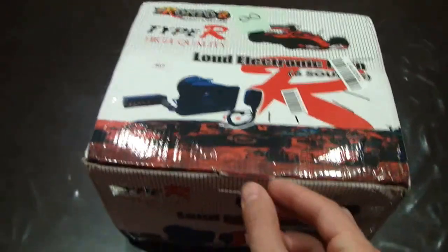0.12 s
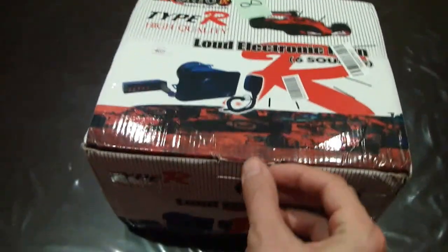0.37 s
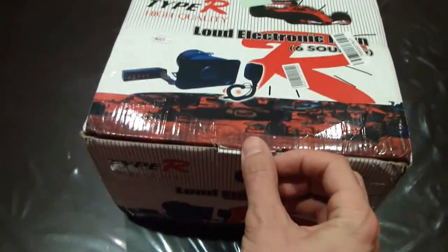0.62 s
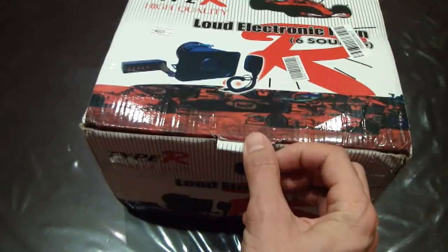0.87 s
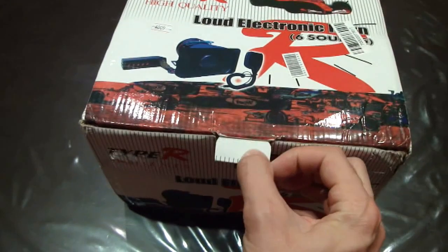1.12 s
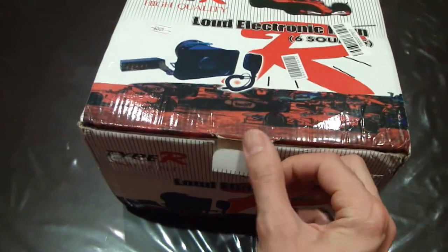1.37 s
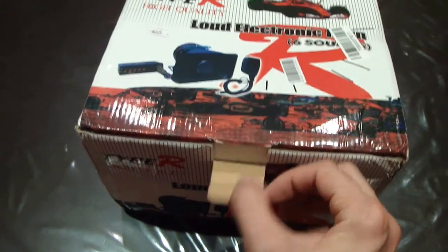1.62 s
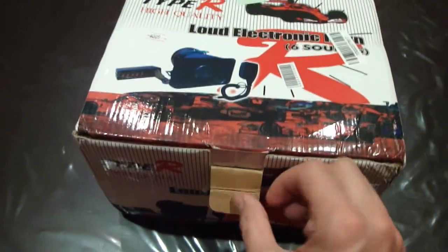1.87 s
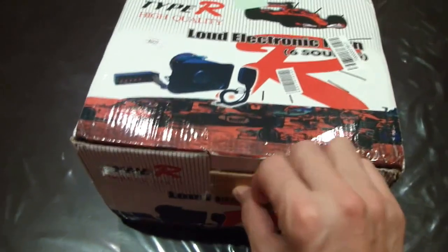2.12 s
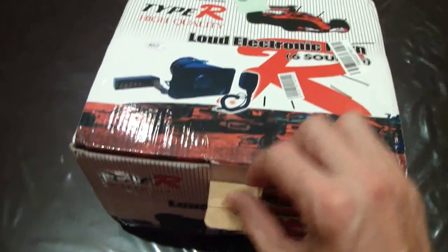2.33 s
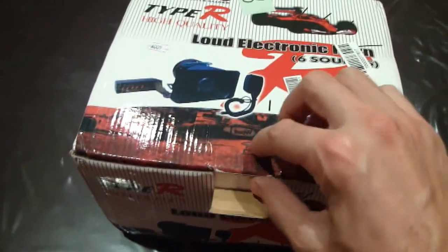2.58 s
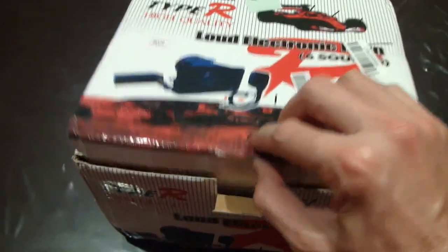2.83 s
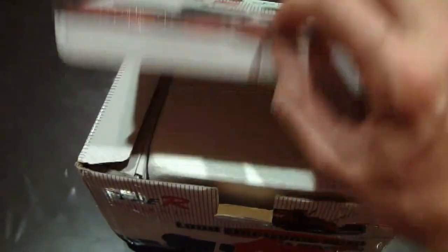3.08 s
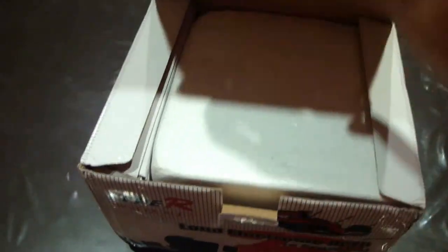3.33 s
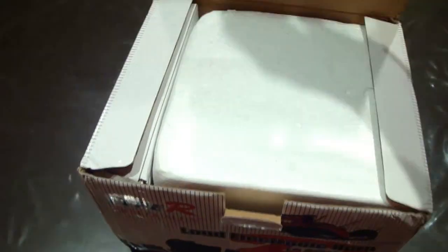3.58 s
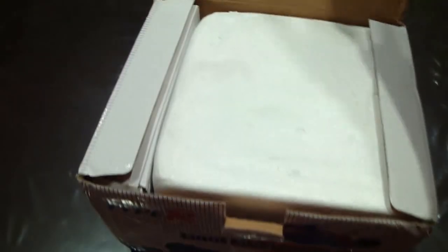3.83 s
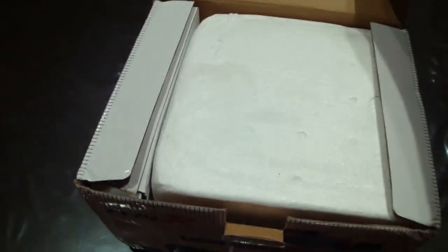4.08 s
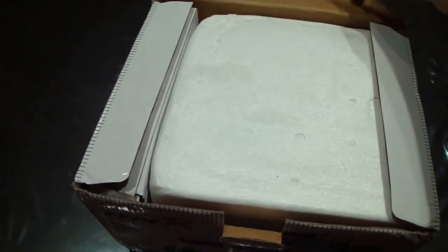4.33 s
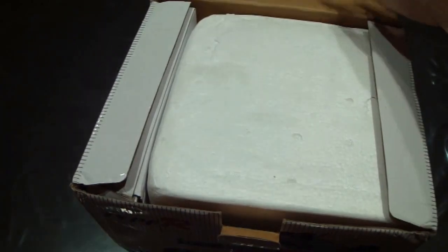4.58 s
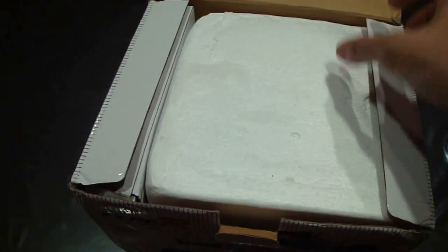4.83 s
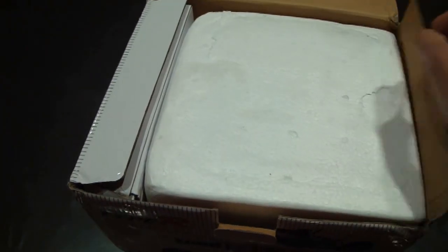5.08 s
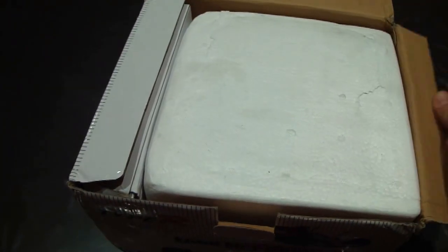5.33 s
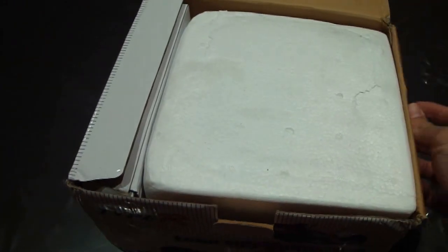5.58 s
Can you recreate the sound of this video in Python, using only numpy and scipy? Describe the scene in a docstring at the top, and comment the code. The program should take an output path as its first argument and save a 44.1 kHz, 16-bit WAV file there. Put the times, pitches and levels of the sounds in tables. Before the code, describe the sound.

Close, dry recording of cardboard handling, with a short, faint room tail. Fingers scratch at a tab, a sharp loud knock jumps out at about a second and a half, then quieter rubbing leads to a quick rattling burst of knocks and hollow drag. Papery scrapes swell in the middle, and sparse clicks and creases finish it. Low hiss and a thin, high, unsteady buzz continue underneath.

```python
"""A hand opens a foam-packed cardboard box in a quiet room, close to the microphone: it works the tab loose,
pulls the lid out and folds back a flap. Rubbing fingers are random slips driving rasps and box panels; knocks
are ragged blows that ring the panels; creases snap as filtered bursts; low jolts come through the table.
The room answers with a brief tail of sparse taps. Behind lie hiss, made of random spectra, and a faint
electrical buzz of about sixty ringing ticks a second."""
import sys
import numpy as np
from scipy import signal
from scipy.fft import rfft, irfft
from scipy.io import wavfile
from scipy.ndimage import uniform_filter1d

SR = 44100
rng = np.random.default_rng(int(sys.argv[2]) if len(sys.argv) > 2 else 0)


def master(y):
    """Save y as 16-bit WAV."""
    cut = np.clip(np.atleast_2d(y).T, -1, 1)
    pcm = np.round(cut * 32767)  # scale
    wavfile.write(sys.argv[1], SR, pcm.astype(np.int16))


def volts_from_decibels(level):
    """Turn decibel levels (scalar or array-like) into linear amplitude factors."""
    exponent = np.asarray(level, float) / 20
    return 10 ** exponent


N = 250488  # length in samples

# Room murmur and microphone hiss. Each row: frequency in Hz, relative density in dB per Hz.
HUSH_SPECTRUM = [(15, -57), (25, -31), (113, -13.5), (219, -5.5), (347, -1.5), (375, 1), (405, -2.5),
                 (940, -2.5), (1280, -7), (2750, -11.5), (2970, -11), (5480, -14.5), (6070, -17),
                 (7440, -17.5), (11200, -18.5), (14600, -55), (22000, -120)]
HUSH_DB = -52  # rms level
# The electrical buzz swelling and dropping out. Each row: time in seconds, tick level in dB.
BUZZ_LEVEL = [(0, -51.5), (.85, -52.5), (1.3, -47.5), (2.45, -46.5), (2.55, -50.5), (3.7, -52), (3.9, -48),
              (4.15, -45.5), (4.3, -54), (4.49, -42.5), (4.505, -60), (5.42, -58), (5.44, -46.5),
              (5.57, -53), (5.6, -66), (5.68, -70)]
# Resonances of one tick. Each row: frequency in Hz, width in Hz, relative level in dB.
TICK_MODES = [(4740, 640, 2.5), (5940, 320, -4), (6640, 99, -4), (7620, 100, 1.5), (9240, 580, 5),
              (10360, 600, 3)]
TICKS_PER_S, FIRST_TICK_S, TICK_ECHO_S = 59.94, 0.0066, 0.0011
# How long the room rings. Each row: frequency in Hz, time to fall 60 dB in seconds.
ROOM_T60 = [(150, 0.56), (400, 0.35), (1040, 0.4), (2760, 0.43), (7280, 0.37)]
# The table and the camera jolted. Each row: start in seconds, level in dB, frequency in Hz.
JOLTS = [(1.408, -47, 262), (1.404, -59, 140), (1.402, -68, 40), (2.83, -72, 180), (3.914, -70, 66),
         (4.163, -69, 92), (4.565, -53.5, 200), (4.57, -63, 126)]
JOLT_WIDTH_HZ = 34
# A small box sends out little bass. Each row: frequency in Hz, gain in dB.
RADIATION = [(20, -54), (60, -60), (120, -12), (200, -7), (300, 0), (20000, -0.5)]
# Panels of the box. Each row: frequency in Hz, width in Hz, relative level in dB.
BOX_PANELS = [(181, 44.5, -8), (292, 44, -6.5), (370, 47, -19.5), (468, 126, 0.5), (527, 137, 4.5),
              (639, 110, -0.5), (833, 153, 9), (1104, 74, 10), (1345, 139, 14), (1560, 190, 7),
              (2070, 170, 13.5), (2506, 160, 13.5), (3180, 99, 12), (3400, 92, 13), (3800, 50, -9),
              (4300, 350, 11)]
# Creases and card edges letting go. Each row: start in seconds, level in dB, card ring in Hz, top click in dB.
CREASES = [(1.7724, -34, 3560, -21), (3.7868, -40, 4000, -6), (4.495, -41.5, 3620, -28),
           (5.1433, -43.5, 3050, 3.5), (5.1802, -40, 2750, 0), (5.1806, -35.5, 5030, -6),
           (5.437, -40.5, 4550, -9), (5.4915, -30, 4360, -20), (5.5828, -47.5, 3200, -3),
           (5.598, -35, 4230, -5), (5.615, -41.5, 2400, -21), (5.6396, -49.5, 3690, -8.5)]
# Blows on the box. Each row: start in seconds, level in dB, then the big panels, middle panel, small panels
# and crackle, each in relative dB.
BLOWS = [(0.72, -30.5, -14, -17, -11, 9), (0.923, -41.5, -11.5, -42, -32, -15),
         (1.402, -20, -9, -29, -17, 5.5), (1.4037, -13, -9.5, -21, -15.5, -25),
         (1.621, -40, -8, -10, -15, -7), (1.626, -33, -4, -6.5, -18, -11), (1.665, -37.5, -1, -3, -19, -11),
         (2.108, -44.5, 2.5, -23, -17, 3.5), (2.809, -39.5, 1, -19, -13, -8),
         (2.832, -29, 1, -26, -16.5, -20), (2.852, -34, -3, -29, -11, -18), (2.866, -48, -21, -22, -9, -16),
         (2.897, -28, -20, -50, -27.5, -20), (2.91, -33, -14, -31, -14, -1),
         (2.922, -30.5, -9, -24, -22, -11), (2.939, -36, -27, -2, -7, -6), (3.559, -46, -24, -7, 11, 0),
         (3.914, -41, -16, 11, -23, 6), (4.162, -39.5, 0, 3, -30, 7), (4.5605, -40, -15, -10, -11, 5),
         (4.5631, -29.5, -1, 4, -15.5, -10), (4.572, -37, 0, -6, -15, -1), (4.582, -36.5, 9, -4, -19, 6),
         (5.053, -39, -31, -4, -22, -3), (5.46, -41, -30, -16, -17, -3)]
# Contact in seconds of the hardest blow, and how much longer it gets (as a fraction) per dB softer.
CONTACT_S, LONGER_PER_DB = 0.0022, 0.1173
# Fingers and card edges rubbing over card. Each row: peak in seconds, swell in seconds, fade in seconds,
# level in dB, rasp at the peak in Hz.
FINGER_RUBS = [(0.736, 0.012, 0.016, -45, 2670), (.765, 0.041, 0.04, -51.5, 3400),
               (.89, 0.022, 0.094, -53.5, 3400), (1.01, 0.077, 0.22, -47, 2620),
               (1.0, .07, .2, -49.5, 4430), (1.07, 0.24, 0.29, -48.5, 3630), (1.2, .1, 0.17, -56, 2480),
               (1.387, 0.066, 0.06, -48, 3260), (1.672, 0.062, 0.062, -49.5, 3200),
               (1.77, 0.042, 0.016, -40, 2980), (1.77, 0.042, 0.016, -37.5, 3480),
               (2.07, 0.027, 0.14, -60, 3800), (2.31, 0.059, 0.24, -54, 3000),
               (2.35, .02, 0.091, -55, 4600), (2.415, .08, .07, -50, 4400), (2.51, 0.013, 0.078, -46, 2950),
               (2.51, 0.017, 0.063, -47, 4440), (2.62, 0.053, 0.038, -58, 3000),
               (2.725, 0.051, 0.097, -53.5, 3020), (2.84, 0.06, 0.11, -41, 2450),
               (2.875, .03, 0.026, -59, 3400), (2.9, 0.05, 0.12, -40, 2300),
               (2.938, .04, 0.019, -39.5, 2200), (2.92, .07, 0.068, -49, 3550),
               (3.33, .05, 0.12, -60, 3850), (3.46, .1, 0.055, -54.5, 3140),
               (3.564, 0.031, 0.028, -44, 3160), (3.56, .02, 0.023, -49, 4070),
               (3.8, 0.013, 0.027, -50.5, 2820), (3.864, 0.041, 0.094, -40, 2560),
               (3.875, .04, .16, -42.5, 3520), (3.949, 0.033, 0.03, -35, 3900),
               (4.0, 0.045, 0.18, -50.5, 3530), (3.955, 0.05, 0.092, -43.5, 2640),
               (4.12, 0.088, 0.096, -47.5, 2870), (4.175, .015, 0.095, -40.5, 3400),
               (4.215, 0.093, 0.076, -43, 2750), (4.22, 0.069, 0.076, -42.5, 4000),
               (4.31, .15, 0.16, -47.5, 3090), (4.34, 0.16, 0.12, -49.5, 3700),
               (4.435, 0.19, .08, -45, 2770), (4.435, 0.14, .08, -51, 3900),
               (4.655, 0.091, 0.055, -54.5, 2700), (4.65, 0.054, .05, -56.5, 4100),
               (5.058, 0.018, 0.03, -45.5, 2900), (5.058, 0.013, 0.027, -43.5, 3940),
               (5.148, .06, .04, -49, 3220), (5.18, 0.014, .03, -48, 2880), (5.46, 0.029, 0.13, -50, 2750),
               (5.57, .015, .06, -49.5, 3220), (5.61, .04, 0.063, -51, 2900)]
# Walls of the box dragged or flexed. Each row: peak, swell and fade in seconds, level in dB.
WALL_DRAGS = [(.735, 0.012, 0.014, -40.5), (.767, 0.018, 0.029, -46.5), (.9, 0.054, .1, -53),
              (1.01, .1, .25, -48), (1.205, .08, 0.074, -55), (1.35, 0.11, 0.29, -49.5),
              (1.64, 0.019, 0.048, -42), (1.77, 0.094, 0.043, -44), (2.13, 0.14, 0.13, -54),
              (2.3, .06, 0.21, -53), (2.52, 0.035, 0.14, -51.5), (2.62, 0.13, 0.033, -52.5),
              (2.74, 0.08, 0.054, -50), (2.81, 0.017, .05, -41.5), (2.856, 0.047, 0.021, -29),
              (2.912, 0.046, 0.074, -30.5), (3.46, .15, 0.047, -58), (3.564, .05, 0.02, -47.5),
              (3.925, 0.078, 0.035, -49.5), (3.97, 0.03, 0.22, -49.5), (4.1, 0.056, 0.065, -51),
              (4.18, .04, 0.23, -49), (4.435, 0.13, .12, -50.5), (4.6, 0.011, 0.11, -49.5),
              (4.71, 0.066, .04, -58), (5.058, .05, .04, -55), (5.17, 0.046, 0.12, -51),
              (5.495, 0.05, .12, -48)]
# Glossy skin of the card sizzling under a finger. Each row: peak, swell and fade in seconds, level in dB.
SKIN_SIZZLES = [(.89, .04, .1, -60), (1.02, 0.14, .25, -62), (2.08, .04, .18, -57), (2.39, 0.16, .08, -54),
                (2.51, 0.017, 0.038, -44), (3.31, .02, 0.13, -60), (3.564, .035, 0.033, -65),
                (3.95, .015, 0.013, -46), (4.18, 0.061, .12, -58), (4.43, 0.21, .07, -64.5),
                (4.67, .03, .03, -61), (5.148, 0.078, 0.039, -53.5), (5.18, .015, 0.018, -44),
                (5.324, 0.12, .04, -59), (5.594, .05, .06, -56)]
# Fine hiss of the rubbing. Each row: frequency in Hz, relative level in dB.
RUB_HISS_COLOUR = [(5000, 16), (6000, 12), (8600, 10.5), (11000, 4.5)]
EDGE_DB = -20  # a stroke stands here, relative to its peak, one swell before and one fade after
RASP_WIDTH_HZ, CLIMB_HZ_PER_S = 1110, 1360  # width of each of two passes; the rasp climbs during a stroke
CORE_WIDTH_HZ, CORE_DB = 320, -7  # a narrow core inside the rasp
HISS_DB, PANELS_DB, PANELS_BELOW_HZ = -5.5, -4.5, 3810  # low rasps ring the small panels too
SIZZLE_HZ, SIZZLE_WIDTH_HZ = 10260, 2200  # width of each of two passes


def evened(x):
    """Scales to rms 1."""
    return x / np.sqrt(np.mean(x ** 2) + 1e-20)


def read(points, hz):
    """Reads a table on a log-frequency axis."""
    f, value = np.transpose(points)
    return np.interp(np.log(hz + 1), np.log(f + 1), value)


def add(mix, s, sound):
    """Mixes a sound in at a time in seconds."""
    part = mix[round(s * SR):][:len(sound)]
    part += sound[:len(part)]


def resonate(x, hz, width_hz):
    """Shifts the curve hz down to zero, smooths, and shifts back: a resonance of gain 1."""
    turn = np.exp(2j * np.pi * np.cumsum(hz * np.ones(len(x))) / SR)
    pole = np.exp(-np.pi * width_hz / SR)
    smooth = signal.lfilter([1 - pole], [1, -pole], x / turn)
    return 2 * (turn * smooth).real


def resonate_twice(x, hz, width_hz):
    """Two equal resonances in a row, for steeper skirts."""
    return resonate(resonate(x, hz, width_hz), hz, width_hz)


def ring(modes, size):
    """Decaying sine of each mode, one row a mode; wide modes die sooner."""
    hz, width_hz, db = np.transpose(modes)[:, :, None]
    t = np.arange(size) / SR
    return volts_from_decibels(db) * np.exp(-np.pi * width_hz * t) * np.sin(2 * np.pi * hz * t)


def coloured(x, points):
    """Filters by a spectrum in dB, steeply closed outside it."""
    hz = np.fft.rfftfreq(len(x), 1 / SR)
    inside = (hz > points[0][0]) & (hz < points[-1][0])
    return irfft(rfft(x) * volts_from_decibels(read(points, hz)) * inside, len(x))


def hush():
    """Room murmur and microphone hiss: random short-time spectra with faint drifting patches."""
    frames, hz = N // 256 + 5, np.fft.rfftfreq(1024, 1 / SR)
    real, imaginary, patches = rng.standard_normal((frames, 513, 3)).T
    patches = uniform_filter1d(patches, size=14, axis=0)  # across frequency
    patches_db = 1.0 * evened(uniform_filter1d(patches, size=16, axis=1))  # across time
    spectra = (real + 1j * imaginary) * volts_from_decibels(read(HUSH_SPECTRUM, hz)[:, None] + patches_db)
    noise = signal.istft(spectra, nperseg=1024, noverlap=768)[1][:N]
    return volts_from_decibels(HUSH_DB) * evened(noise)


def buzz():
    """The same short ringing tick and its echo, evenly spaced, each a little different in size."""
    t = np.arange(FIRST_TICK_S, N / SR, 1 / TICKS_PER_S)
    level_db = np.interp(t, *np.transpose(BUZZ_LEVEL)) + 1.0 * rng.standard_normal(len(t))
    train = np.zeros(N)
    train[np.round(t * SR).astype(int)] = volts_from_decibels(level_db)
    signs = (-1.) ** np.arange(len(TICK_MODES))
    tick = signs @ ring(TICK_MODES, size=300)
    tick = tick + 0.67 * np.roll(tick, round(TICK_ECHO_S * SR))
    tick = tick / np.sqrt(np.mean(tick[:90] ** 2))  # levelled over its first 2 ms
    return signal.oaconvolve(train, tick)[:N]


def room(x):
    """Sparse taps of random sign that build up as the walls answer, each band dying at its own speed."""
    taps = np.zeros(SR)
    at = np.arange(200, SR - 20, 20)
    taps[at + rng.integers(0, 20, len(at))] = rng.choice([-1., 1.], len(at))
    taps *= 1 - np.exp(-(np.arange(SR) / SR / 0.017) ** 2)
    hz, t, z = signal.stft(taps, SR, nperseg=256)
    # Hz, dB
    band_db = read([(300, 4.0), (600, 8.5), (1200, -2.5), (3300, -2.0), (4300, -5.0), (9000, -3.0)], hz)
    decay_db = -60 * t / read(ROOM_T60, hz)[:, None]
    tail = signal.istft(z * volts_from_decibels(band_db[:, None] + decay_db), SR, nperseg=256)[1]
    return signal.fftconvolve(x, tail / np.linalg.norm(tail))[:N]


def thumps():
    """A short low jolt, one decaying mode, that reaches the microphone through the table."""
    out = np.zeros(N)
    rise = np.minimum(np.arange(3000) / SR / 0.0044, 1)
    for s, level_db, hz in JOLTS:
        jolt = ring([(hz, JOLT_WIDTH_HZ, 0)], size=3000)[0]
        add(out, s, volts_from_decibels(level_db) * evened(rise * jolt))
    return out


def snaps():
    """A sharp click high up with a short ring of the card edge, both from one noise burst."""
    out, t = np.zeros(N), np.arange(500) / SR
    cracks = rng.standard_normal((len(CREASES), len(t)))
    for (s, level_db, hz, top_db), crack in zip(CREASES, cracks):
        top = resonate(resonate(crack * np.exp(-t / 0.00021), 10200, 3400), 7500, 4500)
        card = resonate_twice(crack * np.exp(-t / 0.001), hz, 1800)
        add(out, s, volts_from_decibels(level_db) * (volts_from_decibels(top_db) * evened(top) + volts_from_decibels(-8.5) * evened(card)))
    return out


def knocks():
    """A ragged blow: each panel is hit three times at its own moments during the contact, and the card crackles."""
    out, t = np.zeros(N), np.arange(3000) / SR
    hz, width_hz, db = np.transpose(BOX_PANELS)[:, :, None]
    chances = rng.random((len(BLOWS), 2, 3, len(BOX_PANELS), 1))
    cracks = rng.standard_normal((len(BLOWS), len(t) + 1))
    damping = np.pi * width_hz * np.clip(hz / 700, 1, 2.5)  # the hand damps the small panels soonest
    hardest_db = np.max(BLOWS, axis=0)[1]
    for row, (late, turn), crack in zip(BLOWS, chances, cracks):
        s, level_db, big_db, middle_db, small_db, crackle_db = row
        contact_s = CONTACT_S * (1 + LONGER_PER_DB * (hardest_db - level_db))
        since = np.maximum(t - late ** 2 * contact_s, 0)  # most hits come early
        rise = 1 - np.exp(-(since * hz / 0.5) ** 2)  # each panel builds over a cycle or so
        tilt_db = read([(500, big_db), (810, middle_db), (1200, -17.0), (2400, small_db)], hz)
        waves = np.sin(2 * np.pi * (hz * t + turn))
        rings = volts_from_decibels(db + tilt_db) * rise * np.exp(-damping * since) * waves
        u = 3 * t / contact_s
        crackle = volts_from_decibels(crackle_db) * np.diff(crack) * u * np.exp(-u)
        body = rings.sum((0, 1)) + crackle
        add(out, s, volts_from_decibels(level_db) * body / np.sqrt(np.mean(body[:300] ** 2)))  # levelled over 7 ms
    return out


def slips(per_s, spread_db):
    """Fibres catching and letting go: random clicks, a few of them large."""
    size = volts_from_decibels(spread_db * np.minimum(rng.exponential(1, N), 4)) * rng.choice([-1., 1.], N)
    return evened(size * (rng.random(N) < per_s / SR))


def stroke(peak_s, swell_s, fade_s, level_db):
    """Where a stroke lies in time, in samples, and its rounded swell and fade."""
    end = min(round((peak_s + 1.5 * fade_s) * SR), N)
    now = np.arange(round((peak_s - 1.5 * swell_s) * SR), end)
    t = now / SR - peak_s
    away = np.abs(t / np.where(t < 0, swell_s, fade_s))
    return now, volts_from_decibels(level_db + EDGE_DB * away ** 1.21)


def pressure(rows):
    """The level of all strokes of a table together, summed in power."""
    power = np.zeros(N)
    for row in rows:
        now, level = stroke(*row[:4])
        power[now] += level ** 2
    return np.sqrt(power)


def strokes():
    """Slips drive the low panels of the box, a climbing rasp for each rub, a fine hiss and a sizzle."""
    judder = volts_from_decibels(1.4 * evened(uniform_filter1d(rng.standard_normal(N), size=300)))  # the grip stutters
    drive = evened(slips(6000, 1.4) * judder)
    panels, low = ring(BOX_PANELS, size=2000), np.array(BOX_PANELS)[:, 0] < 1600
    boom = signal.oaconvolve(slips(4000, 1.6) * judder, panels[low].sum(0))[:N]
    other = evened(slips(6000, 1.4) * judder)  # a second finger with its own slips
    small = evened(signal.oaconvolve(drive, panels[~low].sum(0))[:N])
    hiss = evened(coloured(drive, RUB_HISS_COLOUR))
    sizzle = evened(resonate_twice(drive, SIZZLE_HZ, SIZZLE_WIDTH_HZ))
    out = pressure(WALL_DRAGS) * evened(boom)
    out += pressure(SKIN_SIZZLES) * sizzle
    out += volts_from_decibels(HISS_DB) * pressure(FINGER_RUBS) * hiss
    for *row, hz in FINGER_RUBS:
        now, level = stroke(*row)
        glide_hz = hz + CLIMB_HZ_PER_S * (now / SR - row[0])
        finger = drive if hz > 3300 else other
        rasp = evened(resonate_twice(finger[now], glide_hz, RASP_WIDTH_HZ))
        core = evened(resonate(rasp, glide_hz, CORE_WIDTH_HZ))
        rasp = evened(rasp + volts_from_decibels(CORE_DB) * core)
        share = volts_from_decibels(PANELS_DB) * np.clip((PANELS_BELOW_HZ - hz) / 800, 0, 1)
        out[now] += level * (rasp + share * small[now]) / np.sqrt(1 + share ** 2)
    return out


def scene():
    """The handling with its room, over buzz and hush; blows fill the room more."""
    rubbing, blows = strokes() + snaps(), knocks()
    reverberation = room(volts_from_decibels(-16.0) * rubbing + volts_from_decibels(-12.0) * blows)
    hands = coloured(rubbing + blows + reverberation, RADIATION)
    return (hands + thumps() + buzz() + hush())[None]


def low_pass(x):
    """Removes everything above the highest recorded frequency."""
    return signal.sosfilt(signal.butter(12, 12200, fs=SR, output="sos"), x)


def record(dry):
    """Closes the treble steeply at 11.1 kHz."""
    edge = signal.firwin(401, 11100, window=("kaiser", 6), fs=SR)
    mix = signal.oaconvolve(dry, edge[None], "same")
    return low_pass(mix)


dry = scene()
out = record(dry)
master(out)
```